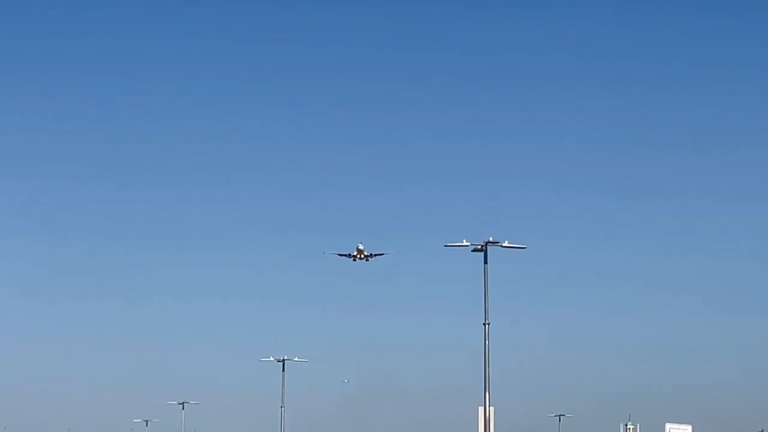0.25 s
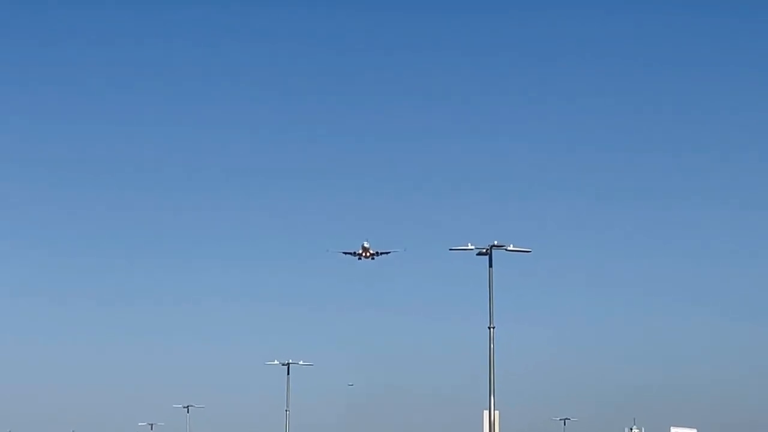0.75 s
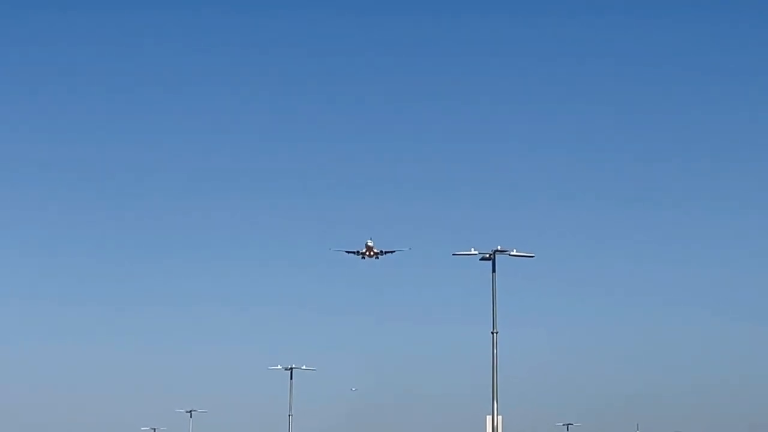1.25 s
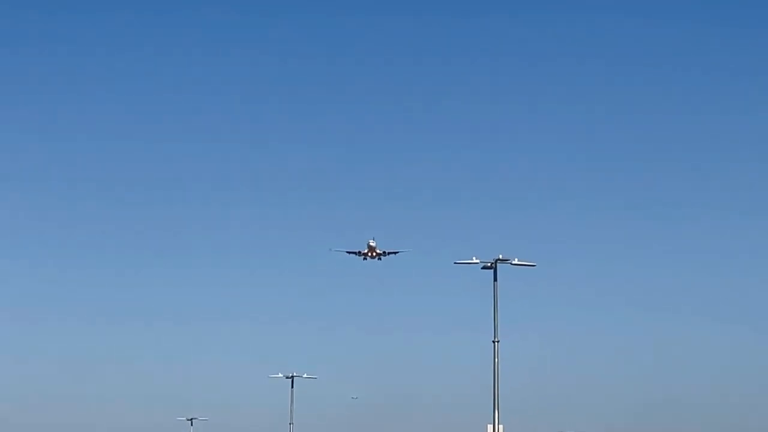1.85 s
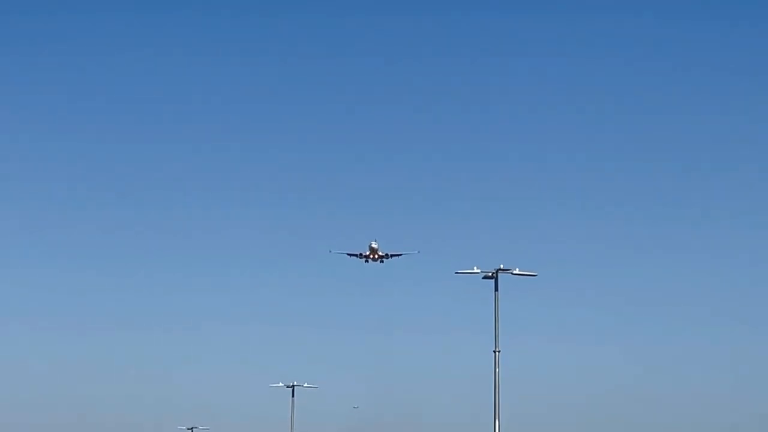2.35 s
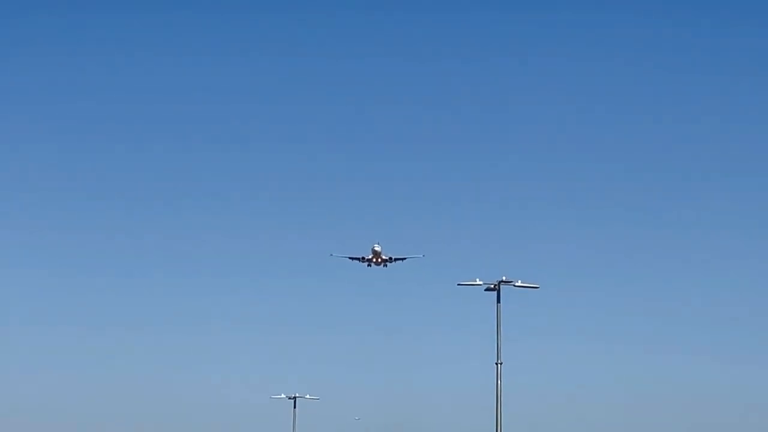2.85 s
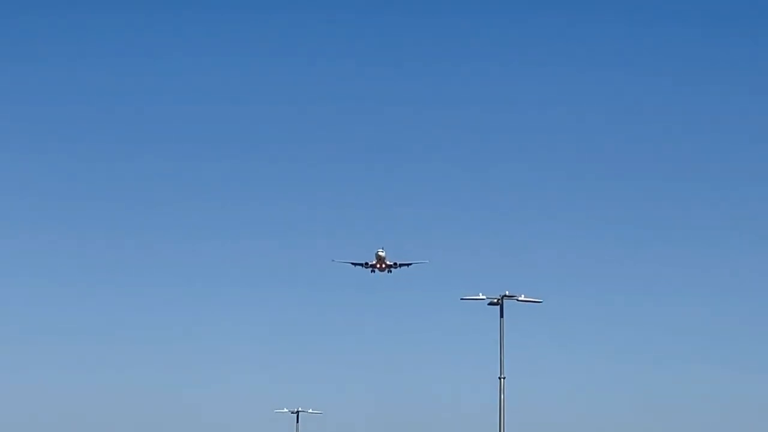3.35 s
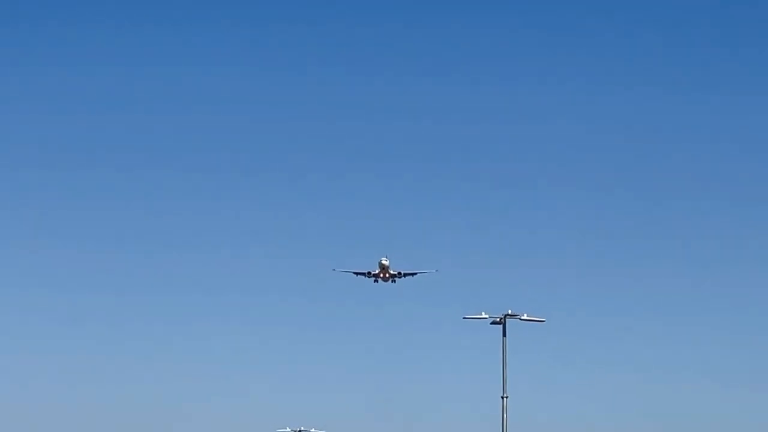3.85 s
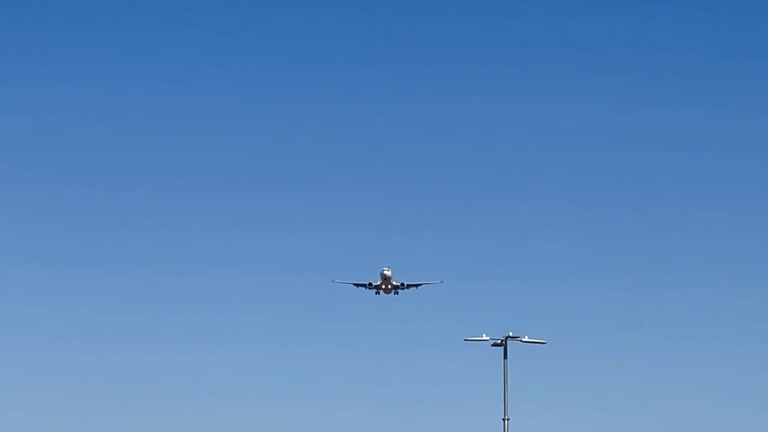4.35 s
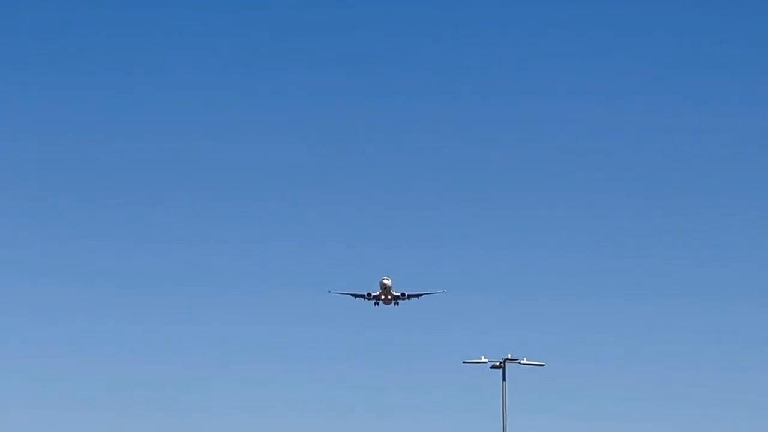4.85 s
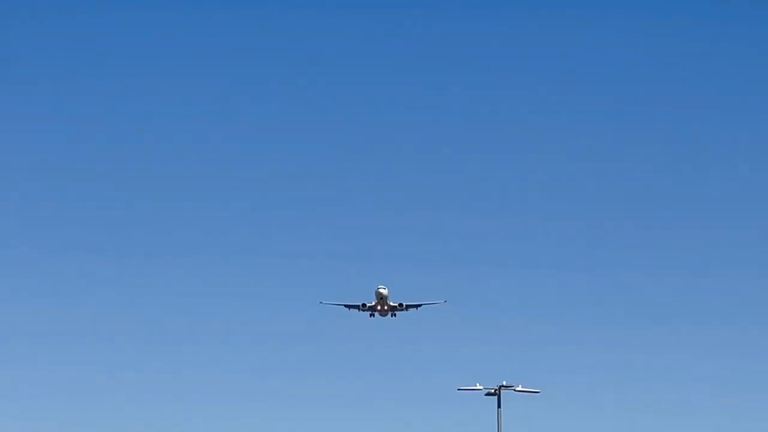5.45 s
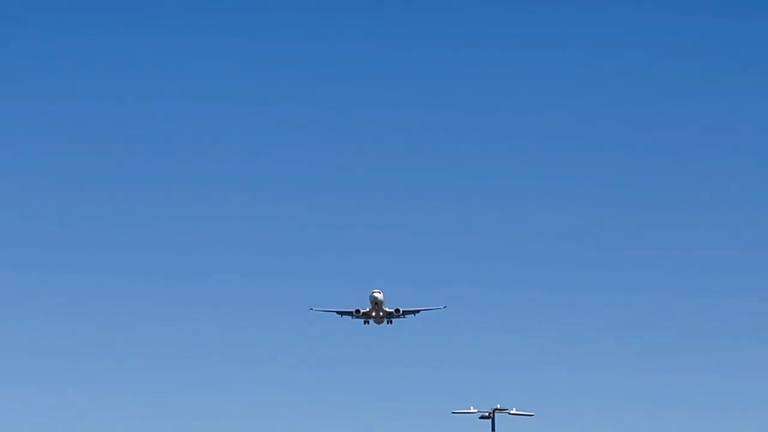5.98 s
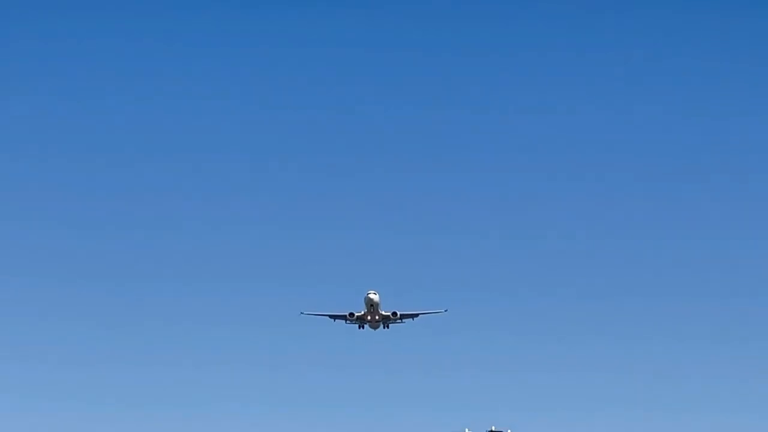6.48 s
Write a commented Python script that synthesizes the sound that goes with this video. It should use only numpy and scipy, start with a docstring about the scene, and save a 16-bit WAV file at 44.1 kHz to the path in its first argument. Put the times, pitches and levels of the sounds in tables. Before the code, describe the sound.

Open air, small stereo microphone without much wind protection. Quick fluttering wind knocks come first over a very faint distant jet hush. From about three seconds the approaching airliner swells into a rough, wavering roar with breathy whines and a thin whistle. Low exhaust rumble builds beneath, and heavy wind thuds hit at the close. The jet is still approaching when the sound cuts off.

```python
"""An airliner on final approach comes head-on: band-filtered noise swells and brightens as the air path shortens.
Sine fan tones sink in pitch; narrow noise bands (whine) and a wavering sine (whistle) flare up on top.
Deep noise makes the exhaust rumble. Gusts rumble as lumpy noise, and eddies slap the ports of a small
stereo microphone as noise bursts, diving tones and pressure pulses. Dry ticks, taps and faint hiss lie below."""
import sys
import numpy as np
from scipy import signal
from scipy.fft import rfft, irfft
from scipy.io import wavfile
from scipy.ndimage import uniform_filter1d

SR = 44100
rng = np.random.default_rng(int(sys.argv[2]) if len(sys.argv) > 2 else 0)


def dump(signal):
    """Clip the signal to [-1, 1] and save it as 16-bit WAV at the path in sys.argv[1]."""
    limited = np.clip(np.atleast_2d(signal).T, -1, 1)
    pcm = np.round(limited * 32767).astype(np.int16)
    wavfile.write(sys.argv[1], SR, pcm)


N = 296352
TIME = np.arange(N) / SR
HZ = np.maximum(np.arange(N // 2 + 1) * SR / N, 1)

# Roar spectrum before humps: (frequency [Hz], relative level per Hz [dB])
ROAR_SPECTRUM = [(65, -32), (110, -2.5), (174, -7.5), (231, 3.5), (321, -2), (548, -2), (951, -6),
                 (1240, -6.5), (1460, -14.5), (1960, -13.5), (2300, -19), (2490, -17.5), (2820, -22.5),
                 (3150, -26), (4740, -51.5), (6160, -82), (10400, -120)]
# Humps and hollows in the roar: (centre [Hz], width [Hz], level [dB])
ROAR_HUMPS = [(220, 84, -2), (770, 99, 0), (900, 220, -2), (1010, 12, 4.5), (1236, 160, 2), (1395, 33, -2),
              (1638, 150, 6), (2070, 210, 2.5), (2290, 92, 1.5), (3800, 440, 2)]
# Roar part that differs between ports, against the common part: (frequency [Hz], level [dB])
ROAR_SIDE = [(150, -10), (280, -11), (450, -15), (750, -20), (1200, -17), (1550, -8), (1900, -11),
             (2250, -19), (2700, -14), (4000, -24)]
# Engine roar over the approach: (time [s], relative level [dB])
ROAR_LEVEL = [(0.0, -49), (2.7, -43), (3.15, -40), (3.6, -34.5), (3.85, -31), (4.1, -31.5), (4.42, -28.5),
              (4.72, -26), (4.95, -26.5), (5.12, -31), (5.5, -26), (5.71, -30.5), (5.87, -29), (6.1, -32),
              (6.45, -31.5), (6.7, -29)]
# Surges and fades of parts of the roar: (time [s], half length [s], centre [Hz], level [dB])
ROAR_SURGES = [(.2, .25, 3700, -3.5), (3.6, .3, 800, 2), (3.85, .14, 2100, 1.5), (2.705, 0.29, 3200, 3.5),
               (3.258, 0.34, 700, 3.5), (3.308, 0.32, 3420, 3.5), (3.753, 0.37, 523, -6.5),
               (4.123, 0.19, 3000, 5.5), (4.362, 0.38, 194, 8.5), (4.798, 0.4, 850, 2.5),
               (4.205, .025, 240, 3), (5.25, .12, 330, 3.5), (4.454, 0.071, 3460, 5.5),
               (4.707, 0.12, 2880, 6), (4.957, 0.25, 3100, -2), (5.139, 0.11, 3480, 10.5),
               (5.32, 0.04, 3200, 6), (5.587, 0.17, 3560, 6), (5.822, 0.14, 2750, 1),
               (6.304, 0.1, 3380, 8.5), (6.477, 0.11, 2940, -4), (6.61, 0.16, 703, -6.5),
               (6.66, 0.13, 3660, 6)]
# Fan blade-passing tone with Doppler shift: (time [s], frequency [Hz])
BLADE_PITCH = [(0, 1562), (2, 1558), (3.8, 1558), (4.3, 1553), (4.7, 1545), (5.3, 1529), (6, 1519),
               (6.72, 1514)]
# Fan harmonics, relative levels: (multiple [1], far [dB], near [dB])
FAN_HARMONICS = [(1, -7, 1), (2, -3.5, 0), (3, 2, 4), (4, -1, 3)]
# Flares of the fan tones: (time [s], half length [s], multiple [1], rise [dB])
FAN_FLARES = [(1.95, .15, 2, 6), (3.15, .1, 2, 8), (3.8, 0.071, 2, 10), (5.28, .1, 2, 11.5),
              (5.47, 0.29, 1, 7), (6.33, 0.048, 1, 8.5), (6.196, 0.19, 3, 5), (6.61, .12, 3, 7)]
# Whine bands, relative levels: (time [s], half length [s], centre [Hz], glide [Hz/s], level [dB])
WHINE_SWELLS = [(2.95, .08, 1280, 3, -8), (3.6, 0.11, 1150, 1.5, 1), (3.72, .12, 1255, 200, 2.5),
                (3.7, 0.18, 1765, 99.5, -0.5), (3.94, 0.052, 1275, -0.5, 1.5), (4.22, .1, 1240, 200.5, -4),
                (4.3, .14, 2000, -0.5, -2), (4.48, 0.065, 1280, -0.5, 6), (4.66, 0.093, 1200, 0.5, 1.5),
                (4.82, 0.14, 1275, 250.5, 4.5), (5.03, 0.053, 1935, -200, 4.5),
                (5.42, 0.075, 1240, 149, 2.5), (5.71, .07, 1280, 0.5, 7.5), (5.86, 0.12, 1245, -200, 3.5),
                (6.19, .09, 1275, -150, 4.5), (6.42, 0.095, 1680, -1.5, -1.5), (6.69, .09, 1350, -2, 6.5)]
# Whistle flares and dips: (time [s], half length [s], change [dB])
WHISTLE_FLARES = [(.52, 0.18, 12), (2.3, .14, 7.5), (2.9, 0.16, 6), (3.87, 0.075, 9), (4.72, 0.15, 8),
                  (5.45, .08, -3), (5.9, .14, 4), (6.66, .1, 6)]
# Left minus right port response: (frequency [Hz], level [dB])
PORT_TILT = [(500, .7), (850, .8), (1100, -2.3), (1300, 0), (1700, 0), (1980, -4.5), (2220, 0),
             (2580, -2.5), (3300, -.2), (4500, .6)]
# Exhaust rumble spectrum: (frequency [Hz], relative level per Hz [dB])
EXHAUST_SPECTRUM = [(40, -27.5), (70, -13.5), (95, 12), (120, 12.5), (160, 6), (220, -1.5), (330, -22),
                    (700, -82.5)]
# Wind rumble spectrum: (frequency [Hz], relative level per Hz [dB])
RUMBLE_SPECTRUM = [(20, -33.5), (35, -23), (52, 0.5), (80, -2), (118, -9.5), (170, -14.5), (260, -26.5),
                   (500, -41), (1000, -70), (2500, -95)]
# Breeze strength on the ports: (time [s], relative rumble level [dB])
BREEZE = [(0.0, -38.5), (0.37, -37), (0.94, -40), (1.14, -35), (1.84, -41), (2.45, -46.5), (2.68, -37.5),
          (3.3, -38), (4.21, -38), (4.54, -28), (5.55, -33.5), (5.95, -25), (6.6, -26)]
# Single gusts and lulls against the breeze: (time [s], half length [s], change [dB])
GUSTS = [(.18, 0.05, 16.5), (.53, .05, 4), (.73, 0.045, 4.5), (1.36, 0.06, 6.5), (2.28, 0.036, 11),
         (2.63, 0.056, 6), (3.47, 0.08, 10.5), (4.0, 0.06, 7), (4.8, .05, 7), (5.3, .05, 3),
         (5.68, .06, -2.5)]
# Eddy turbulence spectrum: (frequency [Hz], relative level per Hz [dB])
SLAP_SPECTRUM = [(80, -20), (180, 8.5), (320, 2), (550, -3.5), (900, -14), (1300, -28.5), (2000, -37),
                 (3500, -69)]
# Hardest eddies, relative levels: (time [s], thud [dB], slap [dB], snap [dB], whoop start control [Hz])
BUFFETS = [(0.115, -20, -21, -29, 940), (0.146, -18.5, -24, -57, 350), (0.167, -12, -16.5, -15, 685),
           (0.177, -9.5, -18, -27, 460), (0.189, -23.5, -16.5, -21, 802), (0.213, -30, -22.5, -29, 810),
           (0.2285, -20, -20.5, -19, 1000), (0.368, -23, -28, -50, 690), (0.531, -38, -38, -60, 450),
           (0.586, -33, -22.5, -45, 455), (0.595, -13.5, -16.5, -25, 654), (0.615, -18, -18, -24, 900),
           (0.631, -24, -29, -20, 1180), (0.656, -18, -21.5, -30, 1007), (0.683, -20, -20.5, -29, 800),
           (0.694, -21, -28, -24, 900), (0.725, -25, -39, -40, 690), (0.887, -31, -25.5, -43, 490),
           (0.908, -18.5, -38, -57, 303), (1.018, -51, -27.5, -43, 700), (1.044, -30, -26.5, -39, 563),
           (1.055, -28, -26.5, -39, 703), (1.115, -32, -24, -43, 595), (1.17, -24, -25.5, -53, 740),
           (1.212, -47, -27.5, -48, 800), (1.235, -33, -25.5, -47, 650), (1.29, -35, -25.5, -32, 1104),
           (1.319, -23, -26, -39, 710), (1.337, -21.5, -22, -38, 618), (1.368, -32, -34, -45, 670),
           (1.392, -40, -32, -25, 690), (1.47, -21.5, -28.5, -51, 357), (1.505, -40, -29, -49, 543),
           (1.524, -41, -32, -49, 500), (1.554, -32, -28, -34, 590), (1.872, -37, -30.5, -49, 447),
           (2.238, -21, -20, -44, 560), (2.33, -22, -26.5, -38, 507), (2.533, -40, -30, -46, 545),
           (2.593, -21, -26, -49, 465), (2.61, -25, -26, -44, 600), (2.63, -22, -23.5, -43, 603),
           (2.65, -34, -33, -48, 540), (2.74, -38, -27, -51, 450), (2.817, -46, -29, -43, 774),
           (2.947, -38, -25.5, -43, 646), (2.986, -34, -25, -42, 650), (3.101, -37, -30, -39, 600),
           (3.383, -28.5, -20, -43, 604), (3.409, -16.5, -21.5, -39, 454), (3.427, -15.5, -20.5, -42, 400),
           (3.439, -18, -16, -22, 600), (3.449, -22, -15, -30, 800), (3.522, -23, -22.5, -41, 500),
           (4.197, -14, -16, -35, 407), (4.785, -13.5, -12, -35, 300), (4.828, -19, -16, -26, 444),
           (5.18, -29, -15.5, -31, 450), (5.21, -26, -14.5, -37, 450), (5.37, -20, -11, -24, 423),
           (6.42, -1.5, -21.5, -31, 150), (6.44, -5.5, -36, -28, 200), (6.58, -20.5, -15.5, -37, 350),
           (6.633, 0.5, -11.5, -31, 330), (6.66, -4.5, -19.5, -37, 280), (6.693, 2.5, -24, -22, 250)]
# Faint dry ticks: (time [s], relative level [dB])
TICKS = [(0.63, -61), (0.649, -66), (0.6665, -66), (0.6796, -58), (0.703, -76), (0.7841, -72),
         (1.5623, -71), (3.8706, -71), (4.82, -66), (4.8364, -66), (5.013, -63), (5.045, -64), (5.075, -68),
         (5.1093, -63), (5.132, -62), (5.153, -61), (5.177, -59.5)]
# Taps on the housing: (time [s], relative level [dB])
TAPS = [(1.392, -51), (1.46, -34)]

# NEAR_M: distance at which the air leaves the roar spectrum unchanged
START_M, SPEED_M_PER_S, NEAR_M = 700, 70, 370
# Air absorbs above the knee, in proportion to path
AIR_KNEE_HZ, AIR_DB_PER_KM_PER_KHZ = 1350, 17.5
# Stray paths: shortest and longest delay at NEAR_M, relative wander, rms level of each
STRAY_LATE_S, STRAY_WANDER, STRAY_DB = (.0012, .008), .03, -22.5
# Low rush at NEAR_M, before its lobe sweeps past
RUSH_DB, RUSH_DB_PER_HALVING = -41.5, 13.5
LOBE_S, LOBE_HALF_S, LOBE_DB = 4.717, 1.2, 15.5
SURGE_OCTAVES, HISS_HZ, HISS_DB = 0.32, 3500, 1
# Late in the approach the broad swell sinks and the fan harmonics change level
TURN_S, TURN_LASTS_S = 5.53, 0.057
SWOOP_FAR_HZ, SWOOP_NEAR_HZ = 560, 360
# Tone offsets against the roar within 50 Hz
FAN_DB, WHISTLE_DB, WHINE_DB = -2.5, -2.5, 0.5
WHISTLE_HZ, WHISTLE_WAVER, WHINE_WIDTH_HZ = 2429, .0035, 135
# Exhaust at NEAR_M, before its one boom
EXHAUST_DB, EXHAUST_DB_PER_HALVING = -32.5, 21
BOOM_S, BOOM_HALF_S, BOOM_DB = 5.79, 0.13, 6
WIND_SIDE_DB = -13.5  # part unlike between ports, against the common part
BREAKUP_DB = -20  # eddies with a weaker slap stay smoother
SIZZLE_HZ, SIZZLE_DB, CUTOFF_HZ = 9600, -62, 13700


def from_db(db):
    """Decibels to gain."""
    return 10 ** (np.asarray(db) / 20)


def rms_one(x):
    """Scale to rms 1."""
    return x / np.sqrt(np.mean(x ** 2) + 1e-20)


def evened(x, size):
    """Hold noise near rms 1 over windows of size samples."""
    return x / np.sqrt(uniform_filter1d(np.mean(x ** 2, axis=0), size=size))


def in_time(rows):
    """Each column of a curve at every sample."""
    s, *columns = np.transpose(rows)
    return [np.interp(TIME, s, c) for c in columns]


def at_hz(points, hz):
    """Read a spectrum on a log-frequency axis."""
    f, db = np.transpose(points)
    return np.interp(np.log(hz), np.log(f), db)


def bell(offset, width):
    """Smooth hump of height 1."""
    return np.exp(-(offset / width) ** 2)


def swells(rows):
    """Sum of smooth level changes [dB]: (time [s], half length [s], level [dB])."""
    return sum(db * bell(TIME - s, length) for s, length, db in rows)


def drift(rate_hz):
    """Slow random drift of rms 1: two-pole low-passed noise, drawn every 40 samples."""
    step, settle = 40, 2000
    r = np.exp(-2 * np.pi * rate_hz * step / SR)
    white = rng.standard_normal(N // step + settle + 2)
    slow = signal.lfilter([1], [1, -2 * r, r * r], white)[settle:]
    return np.interp(np.arange(N) / step, np.arange(len(slow)), rms_one(slow))


def noise(colour_db, side_db):
    """Coloured stereo noise of rms 1: a common part plus a part of opposite sign in the two sides."""
    mid, side = rfft(rng.standard_normal((2, N)))
    stereo = mid + from_db(side_db) * side * [[1], [-1]]
    return rms_one(irfft(stereo * from_db(colour_db), N))


def band(x, low_hz, high_hz):
    """Causal band-pass."""
    return signal.sosfilt(signal.butter(2, [low_hz, high_hz], "band", fs=SR, output="sos"), x)


def band_db(x, low_hz, high_hz):
    """Level of one band, by spectral power."""
    inside = (HZ > low_hz) & (HZ < high_hz)
    power = np.sum(abs(rfft(x)[:, inside]) ** 2, axis=1)
    return 10 * np.log10(2 * np.mean(power) / N ** 2)


def distance_m():
    """Distance shrinking at steady speed."""
    return START_M - SPEED_M_PER_S * TIME


def halvings():
    """Halvings of distance since NEAR_M."""
    return np.log2(NEAR_M / distance_m())


def far_to_near(far, near):
    """Quick smooth glide from far to near value around TURN_S."""
    return far + (near - far) * (1 + np.tanh((TIME - TURN_S) / TURN_LASTS_S)) / 2


def stray_paths(x, count=8):
    """Weak copies over longer paths that shift and fade; fine ripples wander through the spectrum."""
    out = x
    for late_s in np.geomspace(*STRAY_LATE_S, count):
        delay_s = late_s * (1 + STRAY_WANDER * drift(.8)) * np.sqrt(NEAR_M / distance_m())
        copy = np.array([np.interp(TIME - delay_s, TIME, side) for side in x])
        out = out + from_db(STRAY_DB) * drift(2.5) * copy
    return rms_one(out)


def aircraft(rush_hz=560, roar_hz=1350, roar_db=-0.04, edge_db=5.5):
    """Turbulent roar and the tones on it; the path sets the gain of each frequency."""
    humps = sum(db * np.exp(-2 * ((HZ - hz) / width) ** 2) for hz, width, db in ROAR_HUMPS)
    near = stray_paths(noise(at_hz(ROAR_SPECTRUM, HZ) + humps, at_hz(ROAR_SIDE, HZ)))
    rush = RUSH_DB + RUSH_DB_PER_HALVING * halvings() + LOBE_DB * bell(TIME - LOBE_S, LOBE_HALF_S)
    rush = rush - band_db(near, 300, 800)
    roar = in_time(ROAR_LEVEL)[0] + roar_db - band_db(near, 1000, 2400)
    extra_km = (distance_m() - NEAR_M) / 1000
    surges = [(HISS_HZ, HISS_DB)]  # steady fan hiss
    surges += [(hz, db * bell(TIME - s, length)) for s, length, hz, db in ROAR_SURGES]
    edge = edge_db * ((NEAR_M / distance_m()) ** 2 - 1)  # the top opens up at close range

    def path_db(hz):
        """Gain at one frequency: rush below, roar above, less air absorption."""
        engine = np.interp(hz, [rush_hz, roar_hz], [0, 1])
        top = np.interp(hz, [3500, 4900], [0, 1])
        absorbed = AIR_DB_PER_KM_PER_KHZ * extra_km * max(hz - AIR_KNEE_HZ, 0) / 1000
        surge = sum(db * bell(np.log2(hz / centre), SURGE_OCTAVES) for centre, db in surges)
        return (1 - engine) * rush + engine * roar - absorbed + surge + top * edge

    def roar_at(hz):
        """Roar level within 50 Hz of one frequency."""
        return band_db(near, hz - 50, hz + 50) + path_db(hz)

    return flickering_roar(near, path_db) + fan(roar_at) + whines(roar_at) + whistle(roar_at)


def flickering_roar(near, path_db, flicker_db=0.57, swirl_db=0.74, swoop_db=3.5):
    """Roar in overlapping bands: path gain, a sinking swell, shared swirl and separate flicker."""
    centres_hz = np.geomspace(200, 6000, 20)
    swoop_hz = far_to_near(SWOOP_FAR_HZ, SWOOP_NEAR_HZ)
    spectrum, swirl, out = rfft(near), drift(7.4), 0
    for hz, share in zip(centres_hz, np.eye(len(centres_hz))):
        part = irfft(spectrum * np.interp(HZ, centres_hz, share), N)
        swoop = swoop_db * np.exp(-2 * np.log2(hz / swoop_hz) ** 2)
        level_db = path_db(hz) + swoop + swirl_db * swirl + flicker_db * drift(21)
        out = out + part * from_db(level_db)
    return out


def tone(hz, waver=.001):
    """Sine wavering and fading through turbulent air; rms 1."""
    phase = 2 * np.pi * np.cumsum(hz * (1 + waver * drift(25))) / SR
    return rms_one(np.sin(phase) * from_db(2.8 * drift(14)))


def fan(roar_at):
    """Blade-passing harmonics that sink with the Doppler shift and flare up."""
    pitch_hz, = in_time(BLADE_PITCH)
    out = 0
    for multiple, far_db, near_db in FAN_HARMONICS:
        flare_db = swells([(s, length, db) for s, length, k, db in FAN_FLARES if round(k) == multiple])
        level_db = roar_at(multiple * pitch_hz[-1]) + FAN_DB + far_to_near(far_db, near_db) + flare_db
        out = out + from_db(level_db) * tone(multiple * pitch_hz)
    return out


def whine(hz):
    """Breathy noise band around a gliding pitch: slow noise on two carriers in quadrature; rms 1."""
    low_pass_db = np.maximum(-8 * (2 * HZ / WHINE_WIDTH_HZ) ** 2, -100)
    slow = evened(noise(low_pass_db, side_db=0), size=4000)
    phase = 2 * np.pi * np.cumsum(hz) / SR
    return rms_one(slow[0] * np.cos(phase) + slow[1] * np.sin(phase))


def whines(roar_at):
    """Narrow bands of engine noise bloom, glide and fade."""
    out = 0
    for s, length, hz, glide, db in WHINE_SWELLS:
        gain = from_db(roar_at(hz) + WHINE_DB + db) * bell(TIME - s, length)
        out = out + gain * whine(hz + glide * (TIME - s))
    return out


def whistle(roar_at):
    """Wavering whistle tone whose level flares and dips."""
    level_db = roar_at(WHISTLE_HZ) + WHISTLE_DB + swells(WHISTLE_FLARES)
    return from_db(level_db) * tone(WHISTLE_HZ, WHISTLE_WAVER)


def ports(x, turn_hz=1620, width_hz=115):
    """Two ports colour the sound differently; an all-pass resonance turns the right one's phase."""
    ring = 1j * (HZ ** 2 - turn_hz ** 2) / (HZ * width_hz)
    turn = np.stack([np.ones(len(HZ)), (ring - 1) / (ring + 1)])
    response = irfft(turn * from_db(at_hz(PORT_TILT, HZ) * [[.5], [-.5]]), N)
    short = np.roll(response, 1024, axis=1)[:, :2049]  # centred for mode "same"
    return signal.fftconvolve(x, short, mode="same", axes=1)


def exhaust(roll_db=2.15):
    """Large exhaust eddies: deep rolling noise that grows with nearness and booms once."""
    level_db = EXHAUST_DB + EXHAUST_DB_PER_HALVING * halvings() + BOOM_DB * bell(TIME - BOOM_S, BOOM_HALF_S)
    rumble = noise(at_hz(EXHAUST_SPECTRUM, HZ), side_db=-13)
    return from_db(level_db + roll_db * drift(23.0)) * evened(rumble, size=5000)


def wind(level_db=2.0, lumps_db=3, flutter_db=-15, ragged_db=5.0, flutter_ceiling_db=-25):
    """Lumpy low noise that follows breeze and gusts, with small eddies fluttering above it."""
    flow_db = in_time(BREEZE)[0] + swells(GUSTS) + level_db
    steady = evened(noise(at_hz(RUMBLE_SPECTRUM, HZ), WIND_SIDE_DB), size=3000)
    rumble = rms_one(steady * from_db(lumps_db * drift(12)))
    ragged = from_db(ragged_db * np.minimum(drift(33), 2))
    flutter = rms_one(band(noise(at_hz(SLAP_SPECTRUM, HZ), WIND_SIDE_DB) * ragged, 240, 460))
    flutter_level_db = np.minimum(flow_db, flutter_ceiling_db) + flutter_db
    return from_db(flow_db) * rumble + from_db(flutter_level_db) * flutter


def hiss():
    """Very faint steady broadband noise."""
    colour = at_hz([(3000, 2.0), (7000, 1.0), (13000, -6)], HZ)
    return from_db(-88.5) * noise(colour, side_db=-17.5)


def puff(s, rise_s):
    """Pressure of a passing eddy: quick rise to 1, slower fall."""
    age = np.clip((TIME - s) / rise_s, 0, 60)
    return age * np.exp(1 - age)


def knock(rise_s, low_hz, high_hz):
    """Pressure pulse ringing in a steep-edged band; peak 1."""
    pulse = band(puff(0, rise_s)[None, :SR // 10], low_hz, high_hz)
    pulse = band(pulse, 0.93 * low_hz, 2 * high_hz)
    return pulse / abs(pulse).max()


def add(track, s, burst):
    """Mix in a short burst at a given time."""
    start = int(np.clip(s * SR, 0, N - 1))
    track[:, start:start + burst.shape[1]] += burst[:, :N - start]


def small_eddies(count=24, thud_db=0, slap_db=-2, snap_db=-22, scatter_db=3, ceiling_db=-27):
    """Weak eddies at random times, scaled by the breeze up to a ceiling; rows as in BUFFETS."""
    when, size, speed = rng.random((count, 3)).T
    times = (np.arange(count) + when) / count * (N / SR - .1)
    breeze_db = np.minimum(np.interp(times, *np.transpose(BREEZE)), ceiling_db)
    levels = breeze_db + scatter_db * (2 * size - 1)
    return list(zip(times, levels + thud_db, levels + slap_db, levels + snap_db, 350 * 2 ** speed))


def buffets(thud_db=-3, slap_db=-6, snap_db=-4, whoop_db=-5.0, whoop_s=0.006, fall_s=0.00904, end_hz=90,
            breakup=0.7, wake_db=-12, wake_s=0.0094, slap_s=0.0044, thud_lag_s=0.0053, snap_lag_s=.002,
            edge_hz=2000):
    """Eddies hit the ports: dull snap, diving whoop, ringing thud; harder ones add more turbulence."""
    length = SR // 8
    turbulence = evened(noise(at_hz(SLAP_SPECTRUM, HZ), WIND_SIDE_DB), size=200)
    envelope = np.hypot(puff(0, slap_s), from_db(wake_db) * puff(0, wake_s))[:length]
    whoop_shape = puff(0, whoop_s)[:length]
    dive = np.exp(-TIME[:length] / fall_s)
    thud, snap = knock(0.0025, 70, 190), knock(0.00025, 620, 1100)
    out = np.zeros((2, N))
    for s, thud_peak, slap_peak, snap_peak, start_hz in list(BUFFETS) + small_eddies():
        start, sign = round(s * SR), rng.choice([-1, 1], 2)
        burst = turbulence[:, start:start + length]
        cycles = np.cumsum(end_hz + (start_hz - end_hz) * dive) / SR + rng.random()
        phase = 2 * np.pi * cycles + rng.normal(0, .25, (2, 1))  # ports slightly out of phase
        burst_db = slap_peak + slap_db + breakup * min(slap_peak - BREAKUP_DB, 0)
        add(out, s, from_db(slap_peak + whoop_db) * whoop_shape * np.sin(phase))
        add(out, s, from_db(burst_db) * burst * envelope[:burst.shape[1]])
        add(out, s + thud_lag_s, from_db(thud_peak + thud_db) * sign[0] * thud)
        add(out, s + snap_lag_s, from_db(snap_peak + snap_db) * sign[1] * snap)
    return signal.sosfilt(signal.butter(4, edge_hz, fs=SR, output="sos"), out)


def ticks(level_db=-3, rise_s=0.0012, rustle_db=-13, rustle_s=0.01, grain_db=4, tap_db=-2, fizz_db=-21):
    """Dry ticks of bright noise with a grainy rustling tail, and duller taps, near the microphone."""
    rustle = from_db(rustle_db + grain_db * np.minimum(drift(160), 2))
    bursts = sum(from_db(db + level_db) * (puff(s, rise_s) + rustle * puff(s, rustle_s)) for s, db in TICKS)
    taps = sum(from_db(db + tap_db) * puff(s, 0.0018) for s, db in TAPS)
    bright = rms_one(band(band(rng.standard_normal(N), 2800, 7500), 2000, 8500))
    fizz = rms_one(band(rng.standard_normal(N), 8000, 14000))
    dull = rms_one(band(rng.standard_normal(N), 800, 1500))
    return bursts * (bright + from_db(fizz_db) * fizz) + band(taps * dull, 500, 2000)


def scene():
    """Aircraft, wind on the ports, ticks and faint hiss."""
    return ports(aircraft()) + exhaust() + wind() + hiss() + buffets() + ticks()


def record(dry):
    """Microphone drops the deepest bass, adds a faint sizzle that follows the bass, and cuts the top."""
    thin = signal.sosfilt(signal.butter(2, 36, "high", fs=SR, output="sos"), dry)
    sizzle = from_db(SIZZLE_DB) * band(thin, 60, 300) * np.sin(2 * np.pi * SIZZLE_HZ * TIME)
    return signal.sosfilt(signal.cheby2(12, 70, CUTOFF_HZ, fs=SR, output="sos"), thin + sizzle)


dry = scene()
out = record(dry)
dump(out)
```